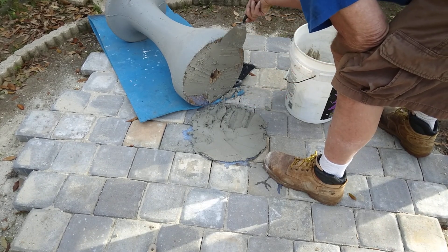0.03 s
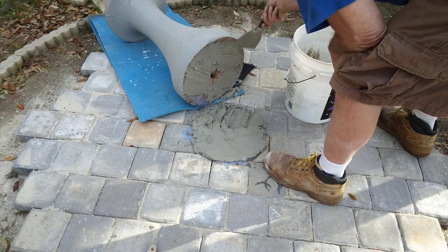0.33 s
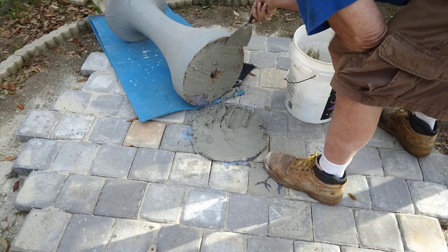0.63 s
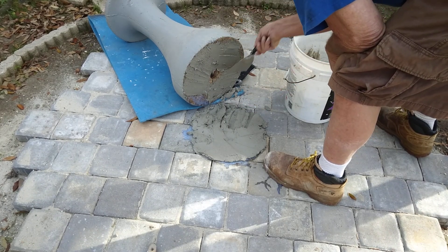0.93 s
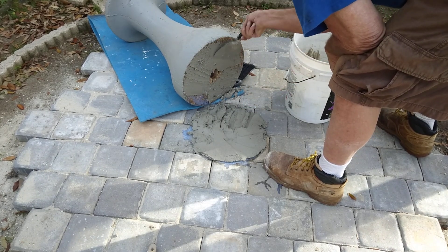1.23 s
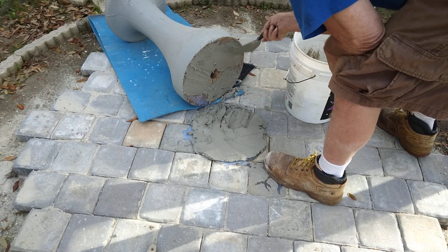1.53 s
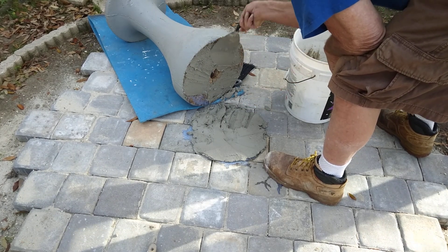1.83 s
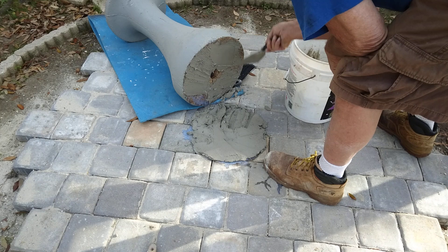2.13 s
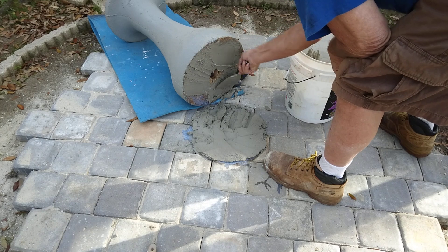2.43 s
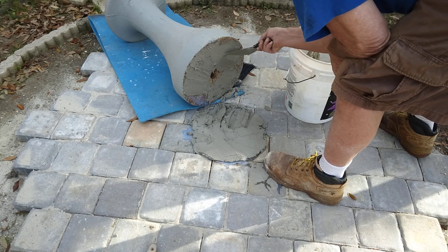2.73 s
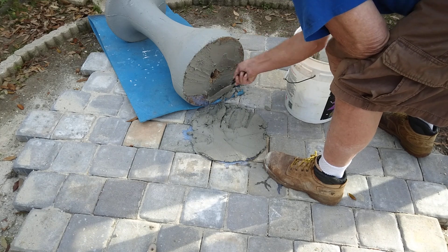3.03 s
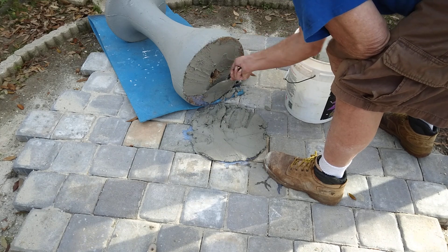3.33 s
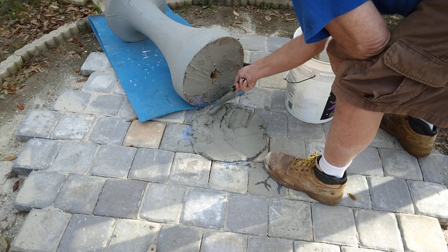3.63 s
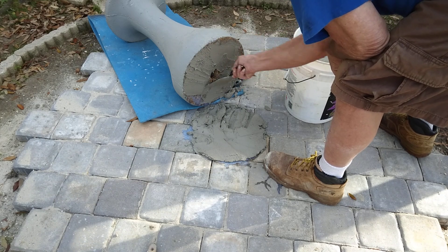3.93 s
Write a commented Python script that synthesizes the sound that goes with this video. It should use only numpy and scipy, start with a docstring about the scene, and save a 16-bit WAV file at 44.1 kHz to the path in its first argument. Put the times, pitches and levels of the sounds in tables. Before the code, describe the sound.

Gritty trowel strokes drag wet mortar across concrete, about nine in a row, mixed with small clicks of the blade. They sound fairly near, outdoors, over a low engine drone, far traffic and faint birds.

```python
"""On a paved patio, a steel trowel spreads wet mortar over the foot of a concrete pedestal.
The blade taps down, drags, bites and lifts. Friction on crackling sand grains excites resonances of
blade and mortar, and the scrape turns hollow towards the rim. Paving and yard scatter the sound.
Behind it a distant engine eases off over a steady hum, small birds whistle faintly,
and far traffic and leaves make a soft bed of noise."""
import sys
import numpy as np
from scipy import signal
from scipy.fft import rfft, irfft
from scipy.io import wavfile
from scipy.ndimage import map_coordinates

SR = 44100
rng = np.random.default_rng(int(sys.argv[2]) if len(sys.argv) > 2 else 0)


def to_wav(sig):
    """Store sig (one row per channel, or 1-D mono) as 16-bit WAV at the path in sys.argv[1].

    Samples outside -1..1 are clipped; the rate is SR.
    """
    pcm = np.clip(np.atleast_2d(sig), -1, 1) * 32767
    pcm = np.round(pcm).astype(np.int16)
    wavfile.write(sys.argv[1], SR, pcm.T)  # frames by channels


N = 176400


def trowel(t):
    """Source and filter: friction and impact excite resonances and hiss; coarse grains crack on top."""
    # resonances of blade on mortar, hollow and bright: f/Hz, bandwidth/Hz, relative level/dB
    hollow_modes = [(525, 250, -13.5), (802, 208, -8), (1290, 220, -4.5), (1594, 430, -3.5),
                    (2027, 360, -3.5)]
    blade_modes = [(2400, 370, 1.5), (3026, 670, 2), (3693, 610, -0.5), (4390, 1440, -6.5)]
    # spectra of hissing sand and of a cracking grain: f/Hz, relative level/dB
    hiss_spectrum = [(300, -13), (900, -10.5), (2000, 0.5), (4000, -1.5), (6000, 4.5), (8100, 4.5),
                     (9300, -11.5), (11500, -23), (15800, -17.5)]
    crack_spectrum = [(400, -30), (1500, 11), (4000, 1), (8200, -7), (9500, -9.5), (11500, -14.5),
                      (15800, -19)]
    rub = strokes(t)
    tap, knocks = taps(t)
    sand = grains(per_s=6000)
    paste = undb(-7.5) * rng.standard_normal(N)
    hollow, blade, hiss = rub * unit(sand + paste) + tap * rng.standard_normal(N)
    cracks = (rub[2] + tap[2]) * unit(colour(grains(per_s=520), crack_spectrum))
    return (undb(-3.5) * hollow.std() * ring(hollow, hollow_modes)
            + undb(-3.5) * blade.std() * ring(blade, blade_modes)
            + undb(-4.5) * hiss.std() * unit(colour(hiss, hiss_spectrum))
            + undb(-8.5) * cracks + knocks)


def strokes(t):
    """Sliding friction: a juddering force sets the envelopes of hollow, blade ring and hiss."""
    # strokes: start, bite, full pressure, lift t/s; release time/s; drag, full, lift level/dB
    # (reached in time order); hollow, ring, hiss gain/dB
    gestures = [ (0.045, .115, 0.073, 0.26, 0.066, -56, -47, -40.5, -1.5, -2.5, 0.5),
                (0.563, 0.662, 0.59, 0.71, 0.085, -48.5, -38.5, -44, 1.5, -2, 2.5),
                (1.151, 1.181, 1.202, 1.207, 0.077, -38.5, -30, -26, -8, 3, -0.5),
                (1.256, 1.385, 1.32, 1.41, 0.088, -59.5, -59, -51, -6, -1, 5),
                (1.76, 1.958, 1.89, 2, 0.092, -53, -38.5, -41.5, 3, 0, 2.5),
                (2.512, 2.545, 2.61, 2.639, 0.027, -39, -29, -30, -5.5, 1, 1),
                (3.117, 3.138, 2.8, 3.16, 0.17, -55, -49.5, -58.5, -7.5, -4, -2.5),
                (3.244, 3.319, 3.364, 3.395, 0.075, -42.5, -36.5, -38.5, 2.5, 1.5, -2),
                (3.857, 3.899, 4.11, 3.93, 0.12, -47, -36, -25, 1, 6, 3)]
    touch_db, release_db, rise_s = -9.5, -33.5, 0.0046
    rub = np.zeros((3, N))
    for start, bite, full, lift, release, drag_db, full_db, lift_db, *gains in gestures:
        hollow_db, ring_db, hiss_db = gains
        times = np.sort([start, bite, full, lift])
        db = np.interp(t, times, [drag_db + touch_db, drag_db, full_db, lift_db])
        db += release_db * np.maximum(t - lift, 0) / release
        force = undb(db) * np.clip((t - start) / rise_s, 0, 1)
        opening_db = np.interp(t, [bite, lift], [-4.5, 1])  # hollower towards the rim
        rub += [force * undb(hollow_db + opening_db), force * undb(ring_db), force * undb(hiss_db)]
    judder = unit(undb(2.5 * walk(130.3)))
    return rub * judder


def taps(t):
    """Impact: each blow gives decaying envelopes of hollow, ring and hiss, and a damped sine knock."""
    # blade taps and snapping grains: t/s, level/dB, decay time/s, hollow and ring gain/dB,
    # knock f/Hz, knock gain/dB
    impacts = [(.023, -43, 0.0032, -5, 3.5, 3060, -13), (0.261, -38, 0.0046, 13.5, -7, 1304, 6.5),
               (.557, -32.5, 0.0034, -1, -9, 1730, -25), (0.721, -31, 0.018, -9, -25, 1340, -1),
               (0.738, -42.5, 0.0059, 1, -23, 840, 4), (0.761, -39.5, 0.01, 4, -1, 840, 9),
               (1.130, -27.5, 0.0053, -6, -1, 3550, 4), (1.142, -41.5, .005, 8.5, -3, 1235, 9),
               (1.329, -33, 0.0045, -2.5, -3.5, 1240, -6), (1.875, -49, 0.017, 6.5, 3, 1880, -12),
               (1.962, -30.5, 0.0076, -4.5, 0.5, 804, 3), (2.006, -34, 0.0091, -1.5, -10, 800, 4.5),
               (2.464, -39, 0.015, -0.5, -1, 2900, -1), (2.636, -43, 0.0034, -5, 0, 1280, 13),
               (3.114, -40.5, 0.0035, -1, 13, 3696, -1), (3.117, -28, .004, -6, -3, 2214, 4),
               (3.13, -44.5, 0.011, -6, 0, 1330, -14), (3.299, -31.5, 0.0037, 7.5, 4.5, 1900, 0.5),
               (3.421, -32.5, 0.0067, 1, 5.5, 2320, 2), (3.435, -36.5, 0.0074, 3, -7, 3550, 4),
               (3.473, -37, 0.0048, 4.5, -22, 1370, 3.5), (3.867, -38.5, 0.013, 1.5, -8, 450, 2),
               (3.877, -36.5, 0.005, 1.5, 7, 2690, 6)]
    rise_s, knock_decay_s = 0.0022, 0.0036
    envelopes, knocks = np.zeros((3, N)), np.zeros(N)
    for at, db, decay, hollow_db, ring_db, hz, knock_db in impacts:
        near = (t > at) & (t < at + .1)
        age = t[near] - at
        force = undb(db) * np.minimum(age / rise_s, 1)
        envelopes[:, near] += undb([[hollow_db], [ring_db], [0]]) * force * np.exp(-age / decay)
        tone = np.sin(2 * np.pi * (hz * age + rng.random()))
        knocks[near] += undb(knock_db) * force * np.exp(-age / knock_decay_s) * tone
    return envelopes, knocks


def grains(per_s, spread_db=3.5):
    """Shot noise: sand grains snap independently, as impulses of very uneven size."""
    hits = rng.random(N) < per_s / SR
    sizes = undb(spread_db * np.minimum(rng.exponential(size=N), 4))
    return unit(hits * sizes * rng.choice([-1, 1], N))


def ring(x, modes, flicker_db=2.5):
    """Resonance: each mode passes one band, whose strength flickers as the contact shifts."""
    out = 0
    for hz, width, db in modes:
        b, a = signal.butter(2, [max(hz - width / 2, 20), hz + width / 2], "band", fs=SR)
        out += undb(db + flicker_db * walk(45)) * signal.lfilter(b, a, x)
    return unit(out)


def patio(x, t):
    """Path difference and scattering: sound arrives first on the right, then from paving and yard."""
    # scattering by rough paving: f/Hz, relative gain/dB
    scatter = [(300, 6.5), (1500, -1.5), (3500, 1), (8000, 0), (15000, 3.5)]
    left_lag_s, paving_lag_s = .000022, 0.0014
    left = map_coordinates(x, [(t - left_lag_s) * SR], mode="nearest")
    # the same strokes on fresh noise make an uncorrelated rasp on each side
    diffuse = np.array([colour(trowel(t - paving_lag_s), scatter) for _ in range(2)])
    return np.array([left, x]) + undb(-6.5) * diffuse + undb(-15) * echoes(x, t60=.4)


def echoes(x, t60):
    """Reverberation: dense reflections, different at each ear, fall by 60 dB in t60 seconds."""
    age = np.arange(SR // 2) / SR
    tail = rng.standard_normal((2, len(age))) * undb(-60 * age / t60) * (age > .001)
    tail /= np.sqrt(np.sum(tail ** 2, axis=1, keepdims=True))
    return signal.fftconvolve(x[None], tail, axes=1)[:, :N]


def engine(t):
    """Harmonic series: a distant engine's partials fall with its speed, beside a hum of fixed pitch."""
    # engine speed: t/s, f/Hz
    speed = [(0, 38.1), (.66, 37.45), (.82, 34.92), (1.0, 32.3), (1.5, 31.69), (1.9, 30.5), (2.5, 30.77),
             (3.1, 30.89), (4, 30.59)]
    # harmonics: order, level/dB under load, level/dB eased off
    harmonics = [(2, -36, -39.5), (3, -44, -44), (5, -54, -50), (6, -54.5, -52), (8, -56, -57.5)]
    # boom of the fourth harmonic: t/s, level/dB
    boom_level = [(0, -40.5), (.65, -38), (.9, -48), (1.3, -39), (1.6, -45), (1.8, -35), (2.05, -42.5),
                  (2.4, -34), (2.68, -36), (2.85, -43.5), (3.15, -41.5), (3.35, -40), (3.55, -37), (4, -46)]
    hum_hz, ease_s = 44.04, (1, 2.11)
    hz = curve(t, speed) * (1 + 0.0095 * walk(10))
    phase = 2 * np.pi * np.cumsum(hz) / SR
    hum = undb(-35 + 0.71 * walk(1.7)) * np.sin(2 * np.pi * (hum_hz * t + rng.random()))
    drone = 0
    for order, load_db, eased_db in harmonics:
        db = np.interp(t, ease_s, [load_db, eased_db]) + 3 * walk(7)
        drone += undb(db) * np.sin(order * phase + 2 * np.pi * rng.random())
    boom = undb(curve(t, boom_level) + 1.5 * walk(14)) * np.sin(4 * phase)
    return np.sqrt(2) * (hum + drone + boom)


def birds(t):
    """Frequency modulation: short whistles glide and waver, blurred by distant reflections."""
    # whistles: t/s, duration/s, starting f/Hz, glide/Hz, relative level/dB
    whistles = [(.79, 0.11, 3350, 130, -60), (.80, 0.041, 3040, -27, -50), (.80, 0.1, 4210, -57, -60),
                (.89, 0.085, 3030, -70, -50.5), (.93, 0.058, 3620, 94, -57), (1.725, .06, 5900, 26, -64),
                (1.725, 0.055, 3260, -51, -56.5), (2.03, .07, 3420, 100, -53),
                (2.14, 0.067, 3552, -20, -58), (2.695, 0.026, 3700, 136, -48), (2.875, .12, 3010, 239, -54),
                (2.86, 0.051, 3450, -94, -53.5), (2.96, 0.036, 6050, 168, -59),
                (3.6, .055, 3440, 73, -55.5), (3.745, 0.044, 3200, 15, -58), (3.81, .04, 2900, -20, -56)]
    out = np.zeros(N)
    waver = 1 + 0.012 * walk(160)
    for at, length, hz, glide, db in whistles + twitter():
        near = (t > at) & (t < at + length)
        progress = (t[near] - at) / length
        phase = 2 * np.pi * np.cumsum((hz + glide * progress) * waver[near]) / SR
        out[near] += undb(db) * np.sqrt(np.sin(np.pi * progress)) * np.sin(phase)
    return undb(-2.5) * out + undb(1) * echoes(out, t60=0.15)


def twitter(count=110, low_hz=2670, high_hz=6960):
    """Independent sources: farther birds chirp at random times and pitches, given as whistle rows."""
    rows = []
    for when, length, pitch, slope, level in rng.random((count, 5)):
        hz = low_hz * (high_hz / low_hz) ** pitch
        glide = 0.1 * hz * (2 * slope - 1)
        rows.append((when * N / SR, 0.039 * (.5 + length), hz, glide, -66 + 1.5 * (2 * level - 1)))
    return rows


def air(t):
    """Partial coherence: far traffic and leaves give a shared rumble under a wide, faint rustle."""
    # outdoor noise spectrum: f/Hz, relative level/dB
    spectrum = [(20, -4.5), (33, -0.5), (55, 1.5), (110, 1), (200, -7.5), (300, -14.5), (450, -22),
                (600, -21), (800, -27), (1500, -32.5), (3300, -32.5), (4200, -36.5), (5200, -44),
                (8000, -42), (9600, -59), (12000, -70), (15800, -68.5)]
    # stereo width: f/Hz, side minus mid level/dB
    width = [(30, -6), (60, -12), (200, -13), (380, -9), (700, -0.5), (1300, 1.5), (8000, -2)]
    # slow drift: t/s, relative level/dB
    drift = [(0, 2.5), (.35, 1), (.95, 0), (1.5, -1.5), (2.3, -1.5), (2.9, -0.5), (3.6, -1.5), (4, -0.5)]
    mid, side = (unit(colour(rng.standard_normal(N), spectrum)) * undb(1.86 * walk(18))
                 for _ in range(2))
    side = colour(side, width)
    return np.array([mid + side, mid - side]) * undb(-37 + curve(t, drift))


def undb(db):
    """Decibels to amplitude ratio."""
    return 10 ** (np.asarray(db) / 20)


def unit(x):
    """Scale to rms 1."""
    return x / np.sqrt(np.mean(x ** 2))


def curve(t, points):
    """Linear interpolation of (t/s, value) points."""
    return np.interp(t, *np.array(points).T)


def colour(x, points, share=1):
    """Filter by (f/Hz, gain/dB) points joined on a log axis; share scales the decibels."""
    hz, db = np.array(points, float).T
    f = np.maximum(np.fft.rfftfreq(N, 1 / SR), 1)
    return irfft(rfft(x) * undb(share * np.interp(np.log(f), np.log(hz), db)), N)


def walk(rate):
    """Random modulation with a spread near 1, through rate new values a second."""
    knots = np.clip(rng.standard_normal(2048), -2, 2)
    return np.interp(np.arange(N) / SR * rate, np.arange(len(knots)), knots)


def scene():
    """Superposition: the trowel on the patio adds to the neighbourhood behind it."""
    t = np.arange(N) / SR
    return patio(trowel(t), t) + birds(t) + engine(t) + air(t)


def record(dry):
    """Frequency response: the left microphone is brighter than the right; a low-pass cuts the top."""
    # imbalance, shared out between the microphones: f/Hz, gain/dB
    balance = [(100, 0), (1500, -0.1), (4400, 0.9), (6000, 0.5), (8100, 8.5), (15000, 1.5)]
    top_hz = 15850
    channels = np.array([colour(dry[0], balance, share=0.34), colour(dry[1], balance, share=-0.63)])
    return signal.sosfilt(signal.ellip(10, .2, 80, top_hz, fs=SR, output="sos"), channels)


dry = scene()
out = record(dry)
to_wav(out)
```